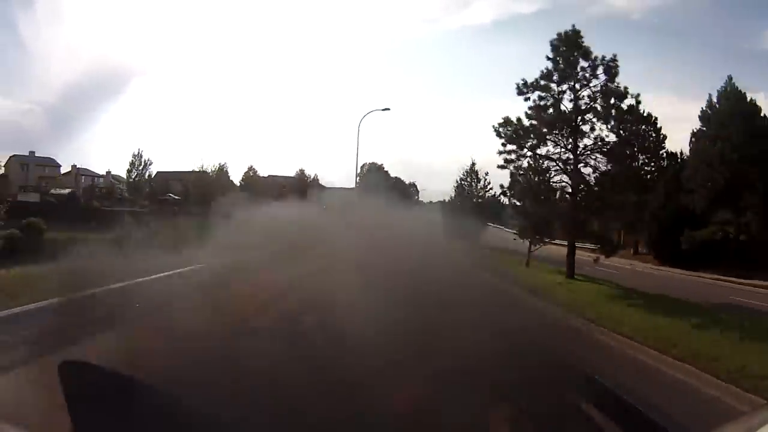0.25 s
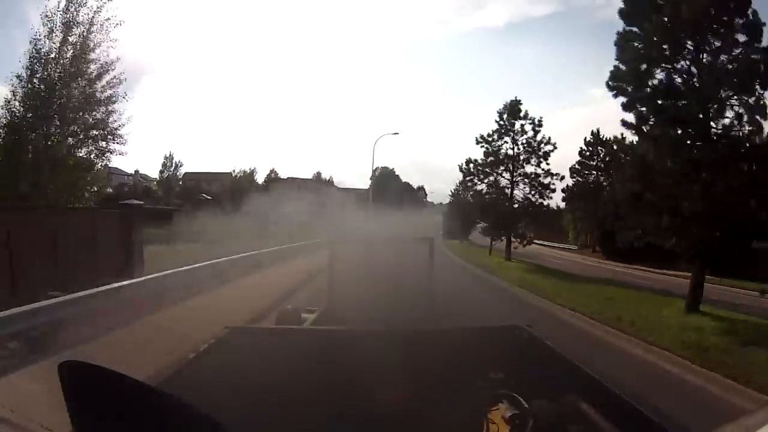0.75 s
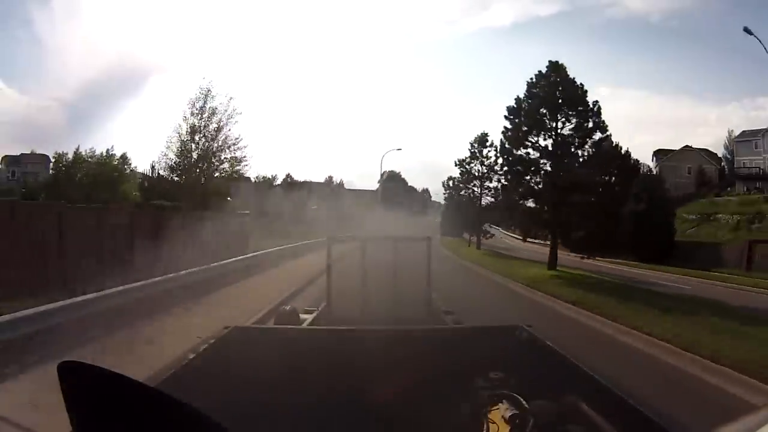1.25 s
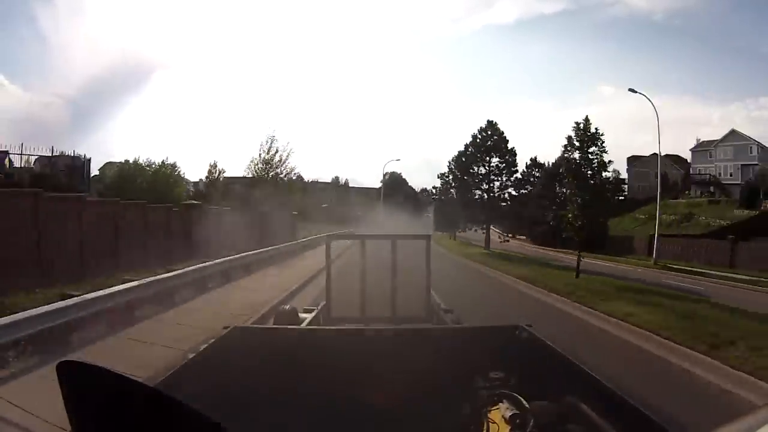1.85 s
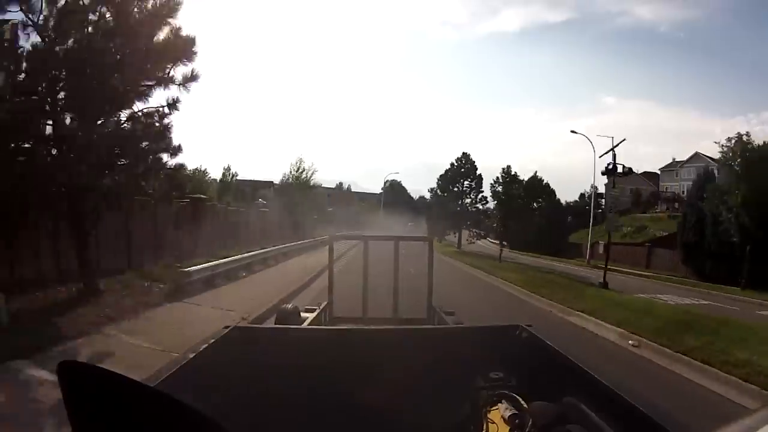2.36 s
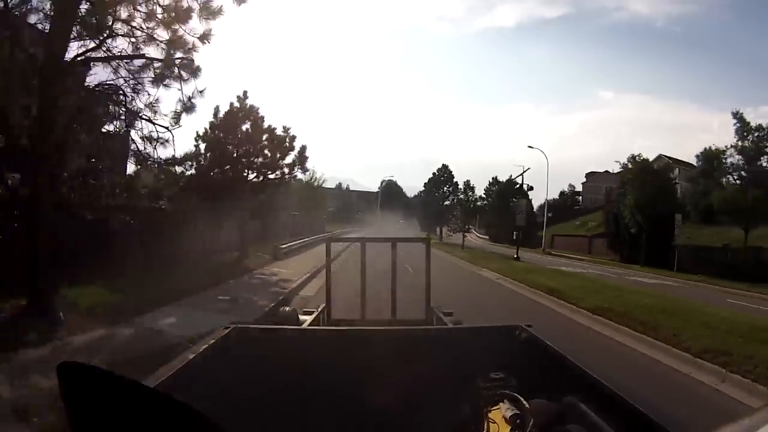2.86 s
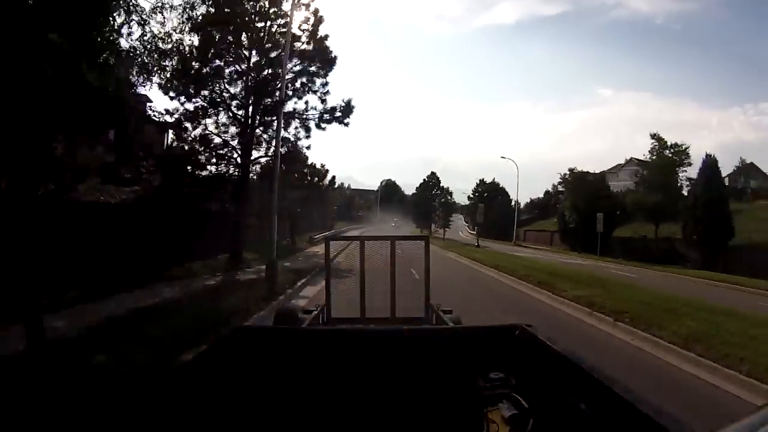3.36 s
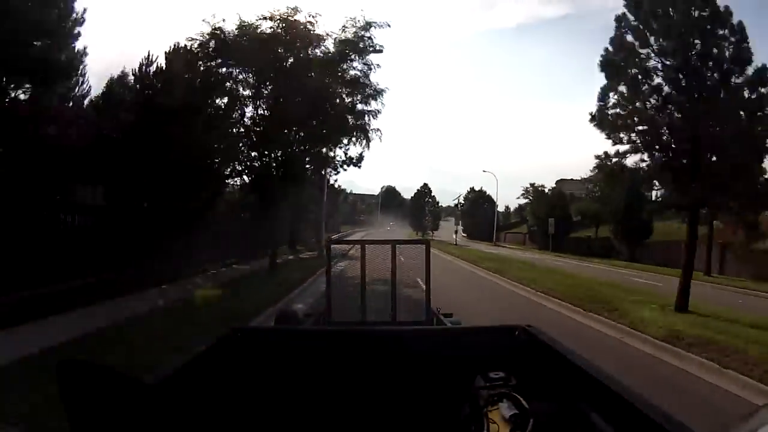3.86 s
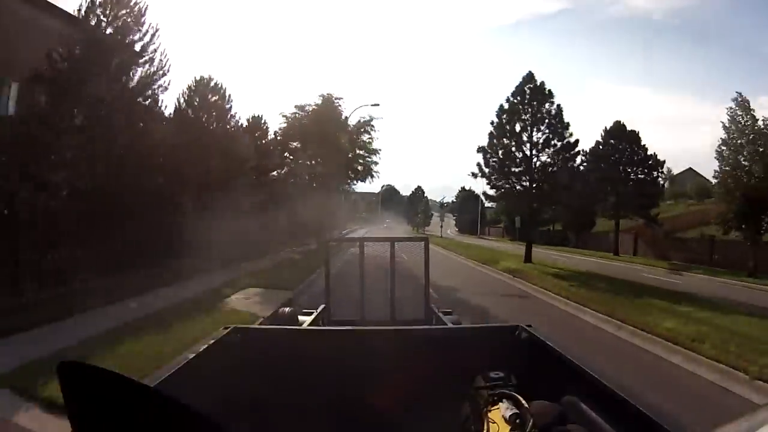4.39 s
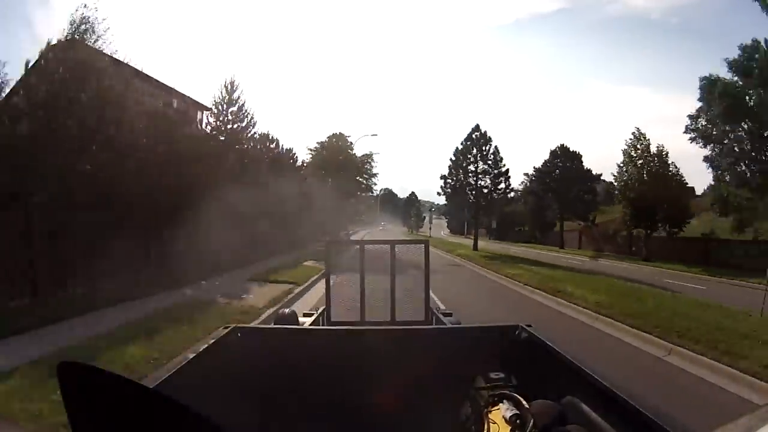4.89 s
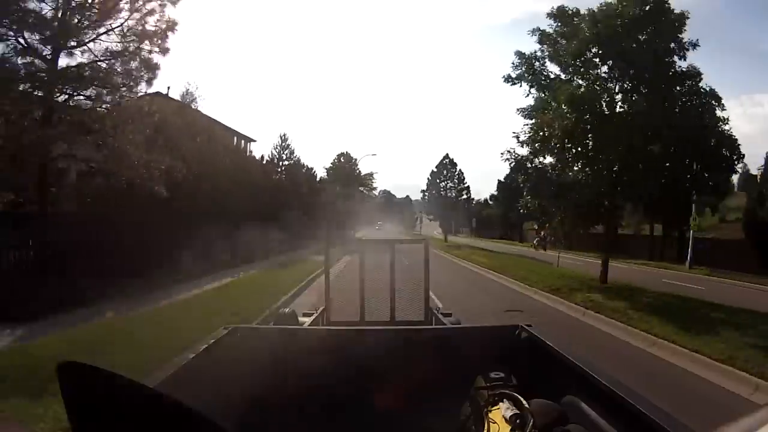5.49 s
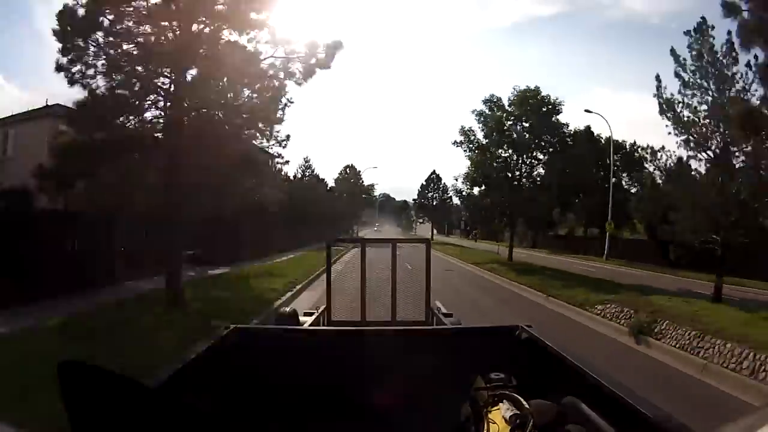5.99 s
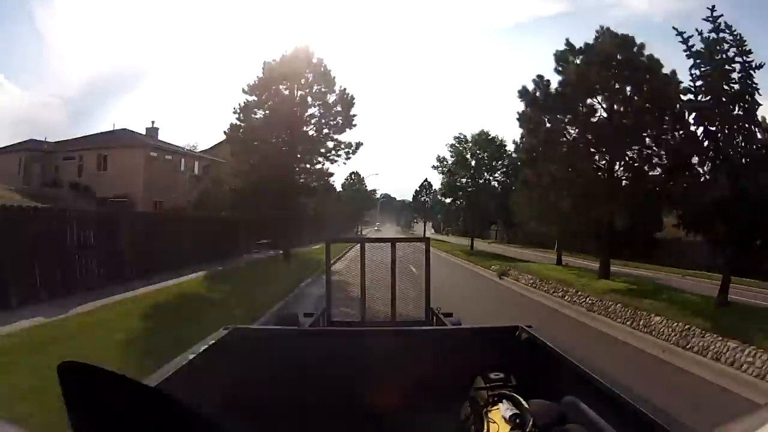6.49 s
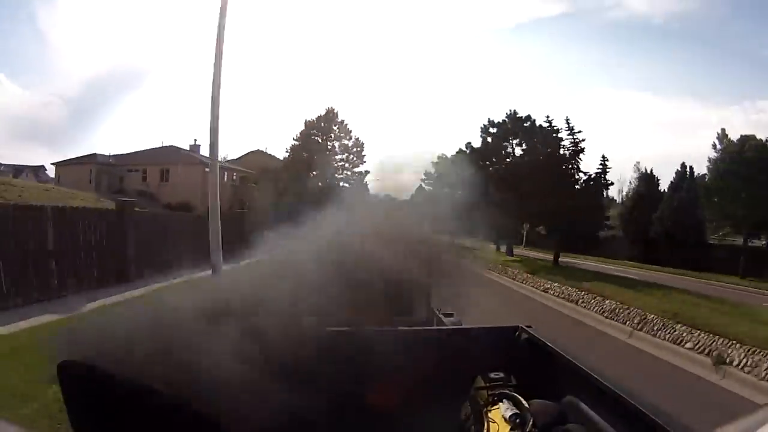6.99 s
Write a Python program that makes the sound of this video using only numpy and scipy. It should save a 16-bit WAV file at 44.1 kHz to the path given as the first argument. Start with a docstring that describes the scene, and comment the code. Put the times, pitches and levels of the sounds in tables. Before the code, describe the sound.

Heard from above the bed of a moving pickup outdoors: a six-cylinder turbodiesel pulling hard, its loud exhaust drone and bark rising slowly for about five seconds. The driver lifts, the roar collapses and pitch drops while turbo air flutters downward, exposing tyre and wind rush. Then power returns at a lower, steady pitch with a rougher, more pulsed growl.

```python
"""A straight-six turbodiesel pulls hard with rising revs, barking and droning above a pickup's bed as it tows.
It lifts off for an upshift while air whooshes through the slowing turbo, then drones on in the higher gear.
Crank speed and effort drive tuned engine orders through tailpipe resonances, and exhaust puffs ring the pipe.
Shaped noise makes the gas roar, rasp and turbo hiss; pressure peaks make the camera housing crackle.
Filtered noise makes the tyres and wind that rush underneath."""
import sys
import numpy as np
from scipy import signal
from scipy.fft import rfft, irfft, next_fast_len
from scipy.io import wavfile
from scipy.ndimage import uniform_filter1d, map_coordinates

SR = 44100
rng = np.random.default_rng(int(sys.argv[2]) if len(sys.argv) > 2 else 0)


def generate_wav(sig):
    """Save sig (samples, or channels by samples) to the path in sys.argv[1] as 16-bit PCM at SR."""
    pcm = np.round(np.clip(np.atleast_2d(sig).T, -1, 1) * 32767).astype(np.int16)
    wavfile.write(sys.argv[1], SR, pcm)


N = 319284

# crank speed: t/s, speed/rpm
CRANK_SPEED = [(0, 1551.9), (0.3, 1590.7), (1.7, 1696.3), (2.6, 1734.4), (3.0, 1748.8), (4.9, 1823.6),
               (5.15, 1716.8), (5.45, 1476.2), (5.8, 1295.8), (6.5, 1282.4), (7.24, 1284.3)]
# how hard the engine works, through pull, lift and return to the pedal: t/s, level/dB
EFFORT = [(0, 0), (.4, 1), (1.4, 0), (2.5, -2.5), (3.7, -0.83), (4.94, -3), (5.06, -17), (5.55, -33.5),
          (5.75, -20), (6.05, -8), (6.27, -2.5), (7.24, -4.5)]
BOOST_LAG_S = 0.14  # time constant of the turbo following the effort

# progress from lugging to pulling, then from pulling to cruising: t/s, share/0-1
BOOSTED = [(.55, 0), (1.25, 1)]
UPSHIFTED = [(5.2, 0.0073), (5.7, 0.85)]

# low resonances of the long tailpipe: f/Hz, width/Hz, relative level/dB
TAILPIPE = [(93.3, 10.6, -12.5), (135, 18, -21), (158.34, 5.3, -10.5), (197.04, 7, -3.5)]
# lowest engine orders: multiple of the crank rate; the seventh comes from the uneven puffs
ORDER_NUMBERS = [3, 6, 7, 9]
# drive of each order: level at 0 dB flow/dB, growth/dB per dB of flow
ORDER_LEVELS = [(0, 0.6), (-0.4, 0.57), (-14, 0.85), (-6.5, 1.56)]
SURGE = 1.2  # dB added to the sixth order per dB that the boost trails the effort

# pipe resonances in each state, four rows per puff of a crank turn: f/Hz, width/Hz, relative level/dB
LUGGING_MODES = [(236, 27, 5.5), (427.7, 38, 10), (643, 62, -4), (705, 570, -16.5), (242, 51, -13),
                 (497, 50, 11.5), (562, 14, 3.5), (735, 30, -10.5), (237, 77, 1), (360, 40, -7),
                 (428, 92, 13), (639, 65, 4.5)]
PULLING_MODES = [(257, 18, -6.5), (459.3, 48, 2.5), (568, 31, -4), (910, 120, -23), (310.7, 48, 6.5),
                 (415.2, 13, 5), (613, 18, -8), (848, 37, -13), (320.3, 28, 4.5), (391, 52.4, 7.5),
                 (460, 16, 1), (620, 22, -17)]
CRUISING_MODES = [(201, 31, -18), (308, 62, -2.5), (380.4, 22, 10.5), (840, 310, -23), (192, 91, -3),
                  (327, 10, -1), (654, 38, -9.5), (840, 63, -4.5), (198.4, 12, 7), (280, 6, 1.5),
                  (349, 41, 13), (836, 370, -19)]
# strongest pipe echo when lugging, pulling and cruising: delay/s, signed share of the puff
ECHOES = [(0.00391, -0.16), (0.00233, 0.43), (0.00445, 0.34)]
# opening front of each of the three puffs: softening f/Hz, relative knock level/dB
FRONTS = [(1310, -26.5), (1370, -12.5), (980, -34)]
KNOCK_HZ, KNOCK_WIDTH_HZ = 820, 1000  # the broad ring at each front
BARK_DB, BARK_GROWS = -13.5, 1.19  # level at 0 dB effort, dB per dB of effort

# colour of the turbulent exhaust roar: f/Hz, relative level/dB per Hz
ROAR = [(200, -38.5), (350, -8.5), (520, -8), (680, 7), (880, -6), (1050, -2.5), (1300, -15), (1700, -18.5),
        (2300, -33), (4000, -75.5)]
ROAR_DB, ROAR_GROWS = -28.5, 0.3  # level at 0 dB boost before the two offsets below, dB per dB of boost
LUGGING_ROAR_DB = 5.5  # extra roar, gone once the pipe has passed to pulling
ROAR_FADE_RPM, ROAR_FADE_DB_PER_RPM = 1816, 0.4  # the roar thins at the top of the pull

# colour of the rasp when pulling and when cruising: f/Hz, relative level/dB per Hz
PULL_RASP = [(700, -34.5), (1300, -1.5), (1650, -2), (2000, 1.5), (2400, -9), (2750, -9.5), (3300, -25.5),
             (4200, -30.5), (7000, -57.5)]
CRUISE_RASP = [(700, -34), (1100, -9), (1400, 6), (1700, -6.5), (2000, 0), (2350, -7), (2700, -4.5),
               (3200, -22.5), (4000, -26.5), (7000, -43.5)]
PULL_RASP_DB, CRUISE_RASP_DB, RASP_GROWS = -34.5, -34, 0.74  # levels at 0 dB boost, dB per dB of boost

# colour of the housing crackle: f/Hz, relative level/dB per Hz
CRACKLE = [(1500, -14.5), (3000, 5.5), (4200, -2.5), (5300, -2.5), (6400, -5.5), (7400, -9), (9000, -7.5),
           (12000, -15.5), (15000, -16.5)]
CRACKLE_DB, CRACKLE_TOP = -52, 1  # level before the rise, pressure at which it levels off
CRACKLE_RISE_RPM, CRACKLE_RISE_DB_PER_RPM = 1769, 0.1041  # more crackle near the top of the pull

# colour of air drawn through the turbo: f/Hz, relative level/dB per Hz
AIR_HISS = [(2500, -11.5), (3600, 2), (4400, 6), (5300, 4), (5800, -5.5), (6400, 5), (7300, -10),
            (8000, -12.5), (8800, -5.5), (10000, -6), (11500, -21.5), (15000, -34.5)]
HISS_DB, HISS_GROWS = -60, 0.23  # mean level at 0 dB boost, dB per dB of boost

# colour of the tyre roar: f/Hz, relative level/dB per Hz
ROAD = [(35, -32), (60, -3), (130, -1.5), (230, -6), (330, -6), (450, -5.5), (600, -13), (800, -21),
        (1100, -21), (1500, -26.5), (2200, -37), (3200, -50.5), (4500, -82)]
TYRES_DB, TYRES_SWAY_DB = -22, 0.55
# colour of the wind rumble: f/Hz, relative level/dB per Hz
RUMBLE = [(10, -14), (22, -2.5), (42, 4.5), (60, 0), (100, -1.5), (200, -22), (500, -64.5)]
WIND_DB, WIND_RISE_DB_PER_S = -36.5, 1.02  # starting level; the wind grows as the truck gathers speed

# air bleeding through the turbo during the upshift
BLEED_OPEN_S, BLEED_ATTACK_S, BLEED_CLOSE_S, BLEED_RELEASE_S = 4.95, 0.25, 5.63, 0.18
WHOOSH_FALL_OCT_PER_S = 0.52
# its bands as the bleed opens: f/Hz, width/Hz, level/dB, fade/dB per s (negative swells)
WHOOSHES = [(714, 130, -31, -8), (1680, 380, -30, 11.5)]
# colour of the bleed hiss: f/Hz, relative level/dB per Hz
BLEED_HISS = [(6000, -41), (8300, -5.5), (9500, -1), (10500, -10), (13000, -34.5)]
BLEED_HISS_DB = -67.5

# left-right likeness of the noises: f/Hz, likeness/0-1
ALIKE = [(200, 1), (500, 1), (1000, 1), (2000, 0.99), (3000, 0.6), (4200, .1), (12000, .15)]
TOP_HZ = 15400  # band limit of the camera


def amp(db):
    """Linear gain for a level in dB."""
    return 10 ** (np.asarray(db) / 20)


def unit(x):
    """x scaled to rms 1 overall."""
    return x / np.sqrt(np.mean(x ** 2) + 1e-20)


def seconds():
    """Time of each sample."""
    return np.arange(N) / SR


def along(points, hz):
    """Read (f/Hz, value) points on a log frequency axis."""
    f, v = np.transpose(points)
    return np.interp(np.log(hz + 1), np.log(f + 1), v)


def curves(rows):
    """One value per sample for each column after the time."""
    s, *cols = np.transpose(rows)
    return [np.interp(seconds(), s, c) for c in cols]


def wobble(rate):
    """A smooth random curve with rate knots a second."""
    knots = rng.standard_normal(int(N * rate / SR) + 4)
    return map_coordinates(knots, [np.arange(N) * rate / SR])


def filtered(x, response):
    """x shaped by a response, real or complex, given as a function of frequency."""
    m = next_fast_len(N + SR // 4)
    return irfft(rfft(x, m) * response(np.fft.rfftfreq(m, 1 / SR)), m)[..., :N]


def levelled(x):
    """x held near rms 1 over a sliding window of about a fifth of a second."""
    power = uniform_filter1d(uniform_filter1d(x ** 2, SR // 7), SR // 10)
    return x / np.sqrt(np.abs(power) + 1e-12)


def rush(spectrum):
    """Stereo noise of rms 1: mono in the bass, nearly unrelated in the treble."""
    def mid_side(hz):
        turn = np.arccos(np.clip(along(ALIKE, hz), -1, 1)) / 2
        return amp(along(spectrum, hz)) * [np.cos(turn), np.sin(turn)]

    mid, side = filtered(rng.standard_normal((2, N)), mid_side)
    return unit(np.array([mid + side, mid - side]))


def load():
    """Effort and turbo boost in dB; the boost follows the effort with a lag."""
    effort_db, = curves(EFFORT)
    effort = amp(effort_db)
    keep = np.exp(-1 / (BOOST_LAG_S * SR))
    boost = effort[0] + signal.lfilter([1 - keep], [1, -keep], effort - effort[0])
    return effort_db, 20 * np.log10(boost)


def pipe_state():
    """How far the pipe has passed to pulling, and from there to cruising."""
    return np.clip(curves(BOOSTED) + curves(UPSHIFTED), 0, 1)


def firings():
    """Running phase in firings: three for each crank turn."""
    rpm, = curves(CRANK_SPEED)
    return np.cumsum(rpm) * 3 / 60 / SR - 0.2


def drone(cycle, lag=0.28, cruise_lag=0.23, waver_db=0.04):
    """Low orders boom near tailpipe resonances; a suction dip follows each puff by lag of a firing cycle."""
    effort_db, boost_db = load()
    rpm, = curves(CRANK_SPEED)
    crank_hz = rpm / 60
    _, upshifted = pipe_state()
    turns = (cycle - lag - (cruise_lag - lag) * upshifted) / 3
    surge_db = SURGE * np.maximum(effort_db - boost_db, 0)
    flow_db = np.maximum(effort_db, boost_db)  # after the lift the turbo keeps gas moving for a moment
    out = np.zeros(N)
    for order, (db, grows) in zip(ORDER_NUMBERS, ORDER_LEVELS):
        power = np.zeros(N)
        for hz, width, peak_db in TAILPIPE:
            detune = 2 * (order * crank_hz - hz) / width
            power += amp(peak_db) ** 2 / (1 + detune ** 2)
        level_db = db + grows * flow_db + waver_db * wobble(18)
        if order == 6:
            level_db = level_db + surge_db
        out -= np.sqrt(2 * power) * amp(level_db) * np.cos(2 * np.pi * order * turns)
    return out


def pipe(modes, hz, soft_hz, edge_hz=1500):
    """Ring of one puff: its resonances, softened by the slow opening of the valve."""
    ring = sum(amp(db) * 1j * hz * w / (c * c - hz * hz + 1j * hz * w) for c, w, db in modes)
    return ring / (1 + 1j * hz / soft_hz) ** 2 / (1 + (hz / edge_hz) ** 4)


def puff_train(cycle, scatter_db, jitter_s, count):
    """One pulse per firing, slightly uneven in time and strength, dealt in turn to count trains."""
    number = np.arange(int(cycle[-1]))
    chance = rng.standard_normal((len(number), 2))
    shift = np.round(jitter_s * SR * chance[:, 0]).astype(int)
    at = np.clip(np.searchsorted(cycle, number) + shift, 0, N - 1)
    puffs = np.zeros((count, N))
    puffs[number % count, at] = amp(scatter_db * chance[:, 1])
    return puffs


def bark(cycle, scatter_db=0.26, jitter_s=0.00004, count=3):
    """The three puffs of a turn take different ways through the manifold and ring differently."""
    puffs = puff_train(cycle, scatter_db, jitter_s, count)
    boosted, upshifted = pipe_state()
    shares = 1 - boosted, boosted * (1 - upshifted), upshifted
    states = LUGGING_MODES, PULLING_MODES, CRUISING_MODES
    out = np.zeros(N)
    for share, modes, (delay, echo) in zip(shares, states, ECHOES):
        ways = np.split(np.array(modes), count)

        def response(hz):
            rings = []
            for way, (soft_hz, knock_db) in zip(ways, FRONTS):
                knock = (KNOCK_HZ, KNOCK_WIDTH_HZ, knock_db)
                rings.append(pipe([*way, knock], hz, soft_hz))
            return np.array(rings) * (1 + echo * np.exp(-2j * np.pi * hz * delay))

        out += share * unit(filtered(puffs, response).sum(0))
    return levelled(out)


def roof_bounce(pressure, level_db=-5, bounce_s=0.0029):
    """A bounce off the cab roof reaches the two ports differently, more so for short waves."""
    side = filtered(pressure, lambda hz: 1j * hz / 5000 * np.exp(-2j * np.pi * hz * bounce_s))
    return amp(level_db) * np.array([side, -side])


def gusts(cycle, lag, depth_db, scatter_db, uneven_db):
    """Gas flow swells once per firing, by a varying amount and unevenly over the three puffs of a turn."""
    swell = depth_db * np.cos(2 * np.pi * (cycle - lag)) + scatter_db * wobble(130)
    lope = np.cos(2 * np.pi * (cycle - lag - 0.75) / 3)
    return levelled(amp(swell + uneven_db * lope))


def gas_roar(cycle, cruise_gaps_db=3):
    """Turbulent gas roars in step with the puffs, with deeper gaps when cruising."""
    rpm, = curves(CRANK_SPEED)
    _, boost_db = load()
    boosted, upshifted = pipe_state()
    roar_db = ROAR_DB + ROAR_GROWS * boost_db + LUGGING_ROAR_DB * (1 - boosted)
    roar_db -= ROAR_FADE_DB_PER_RPM * np.maximum(rpm - ROAR_FADE_RPM, 0)
    depth_db = 5.5 + cruise_gaps_db * upshifted
    flow = gusts(cycle, lag=0.15, depth_db=depth_db, scatter_db=1.6, uneven_db=1.5)
    return amp(roar_db) * flow * rush(ROAR)


def gas_rasp(cycle):
    """Rasp is nearly continuous under load; slower firing leaves gaps between the puffs."""
    _, boost_db = load()
    _, upshifted = pipe_state()
    pull_flow = gusts(cycle, lag=0.24, depth_db=1.5, scatter_db=1.47, uneven_db=-0.5)
    pull = amp(PULL_RASP_DB) * pull_flow * rush(PULL_RASP)
    cruise_flow = gusts(cycle, lag=0.21, depth_db=7.5, scatter_db=1.8, uneven_db=-0.5)
    cruise = amp(CRUISE_RASP_DB) * cruise_flow * rush(CRUISE_RASP)
    return amp(RASP_GROWS * boost_db) * ((1 - upshifted) * pull + upshifted * cruise)


def housing_crackle(pressure):
    """The housing crackles on pressure peaks of either sign, growing faster than the pressure up to a ceiling."""
    rpm, = curves(CRANK_SPEED)
    strain = np.minimum(np.abs(pressure), CRACKLE_TOP)
    peaks = strain ** 1.6 * amp(2.5 * wobble(260) + 1.6 * wobble(27))
    crackle_db = CRACKLE_DB + CRACKLE_RISE_DB_PER_RPM * np.maximum(rpm - CRACKLE_RISE_RPM, 0)
    return amp(crackle_db) * unit(peaks) * rush(CRACKLE)


def exhaust():
    """Drone and bark form the pressure wave; gas noise and housing crackle ride with it."""
    cycle = firings()
    effort_db, _ = load()
    pressure = drone(cycle) + amp(BARK_DB + BARK_GROWS * effort_db) * bark(cycle)
    gas = gas_roar(cycle) + gas_rasp(cycle)
    return pressure + roof_bounce(pressure) + gas + housing_crackle(pressure)


def turbo_hiss():
    """Air drawn through the turbo hisses with the boost."""
    _, boost_db = load()
    return amp(HISS_DB + HISS_GROWS * boost_db + 1.2 * wobble(10)) * rush(AIR_HISS)


def tyres():
    """Tyres roar as coloured noise with a slight sway in level."""
    return amp(TYRES_DB + TYRES_SWAY_DB * wobble(5)) * rush(ROAD)


def wind(buffet_db=2.5):
    """Wind buffets the camera; faint separate eddies make it differ a little at each port."""
    eddies = unit(filtered(rng.standard_normal((2, N)), lambda hz: amp(along(RUMBLE, hz))))
    wind_db = WIND_DB + WIND_RISE_DB_PER_S * seconds() + buffet_db * wobble(14)
    return amp(wind_db) * (rush(RUMBLE) + amp(-24.5) * eddies)


def whoosh(centre_hz, width_hz):
    """A narrow band of noise around a moving pitch."""
    turn = 2 * np.pi * np.cumsum(centre_hz) / SR
    return unit(wobble(width_hz) * np.cos(turn) + wobble(width_hz) * np.sin(turn))


def turbo_bleed(flutter_db=0.5):
    """During the upshift, air bleeds through the slowing turbo in falling, fluttering whooshes and hiss."""
    t = seconds()
    since = np.clip(t - BLEED_OPEN_S, 0, 2)
    opening = np.clip(since / BLEED_ATTACK_S, 0, 1)
    closing = np.clip(1 - (t - BLEED_CLOSE_S) / BLEED_RELEASE_S, 0, 1)
    wheel = 2 ** (-WHOOSH_FALL_OCT_PER_S * since)  # pitch falls as the wheel slows
    air = np.zeros(N)
    for hz, width, db, fade in WHOOSHES:
        level_db = db - fade * since + flutter_db * wobble(22)
        air += amp(level_db) * whoosh(hz * wheel, width)
    return opening * closing * (air + amp(BLEED_HISS_DB) * rush(BLEED_HISS))


def scene():
    """Exhaust up front, turbo air around it, tyres and wind underneath."""
    return exhaust() + turbo_hiss() + tyres() + wind() + turbo_bleed()


def record(dry):
    """The camera clips the highest peaks and keeps nothing above its band limit."""
    return filtered(np.clip(dry, -1, 1), lambda hz: hz < TOP_HZ)


dry = scene()
out = record(dry)
generate_wav(out)
```